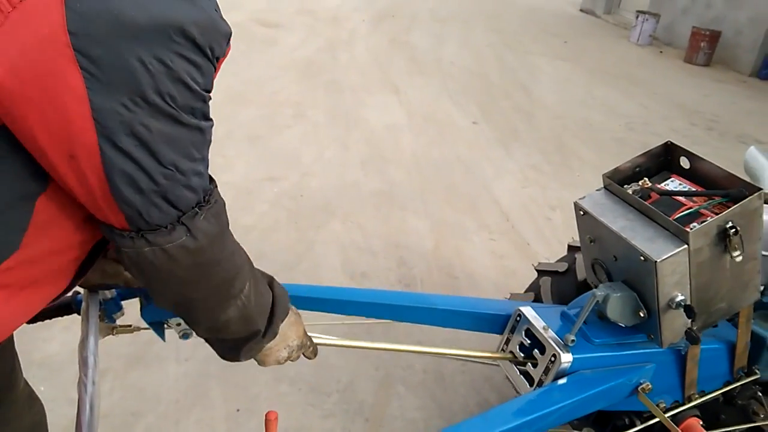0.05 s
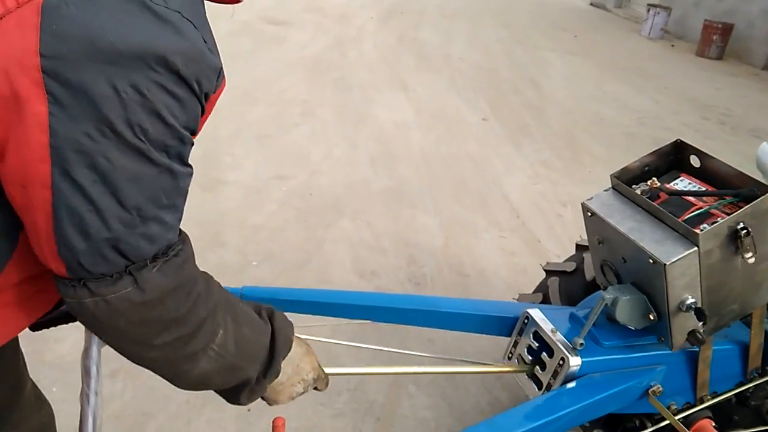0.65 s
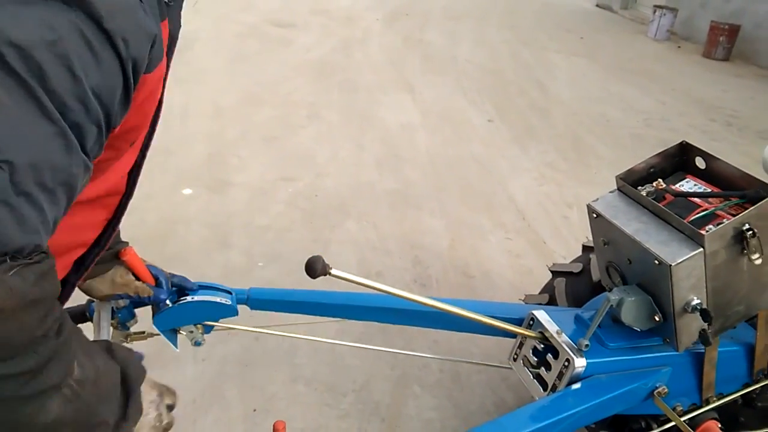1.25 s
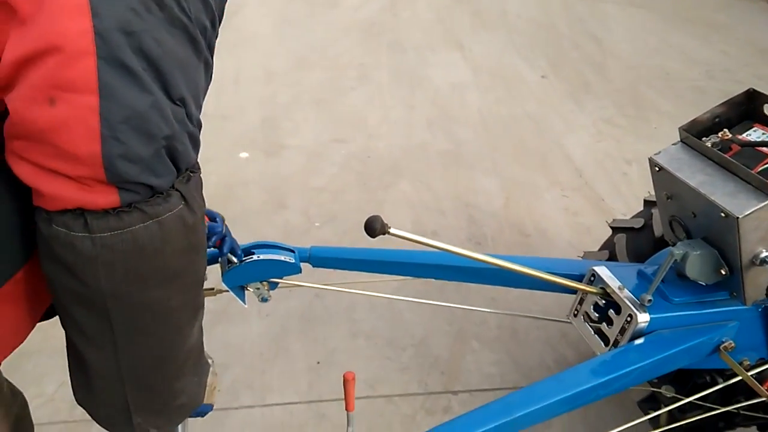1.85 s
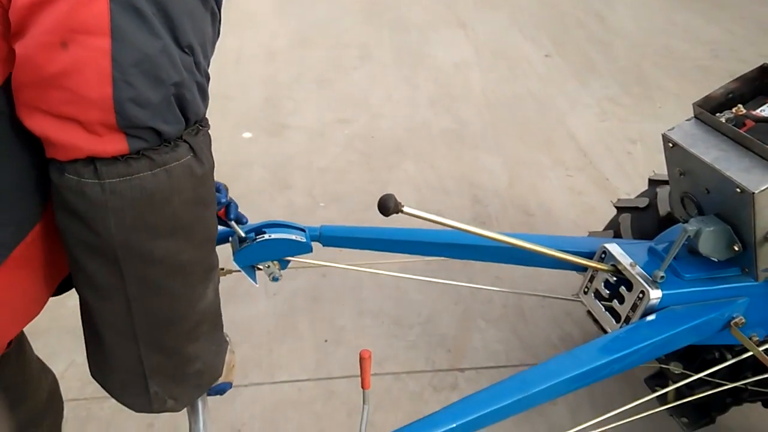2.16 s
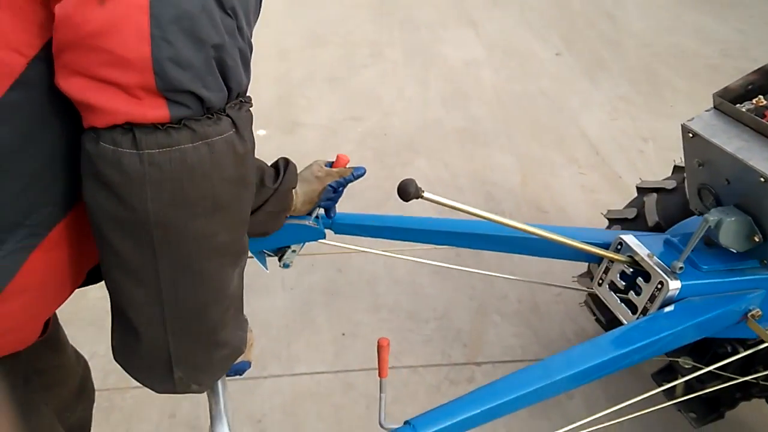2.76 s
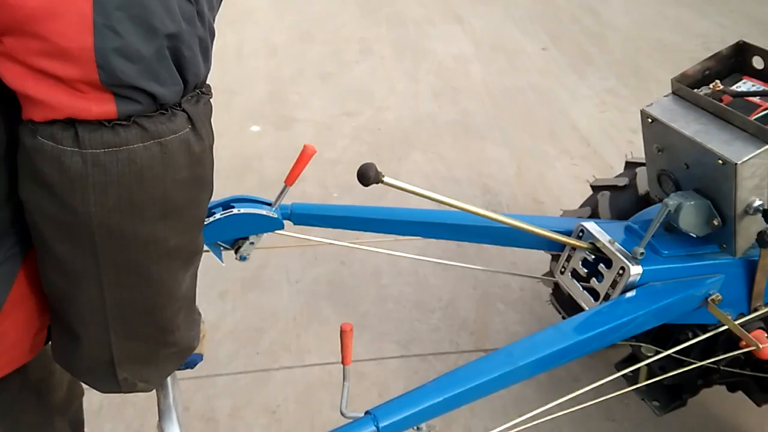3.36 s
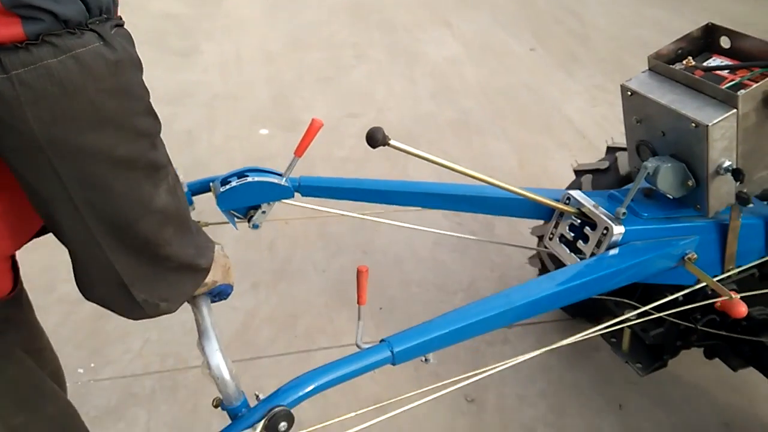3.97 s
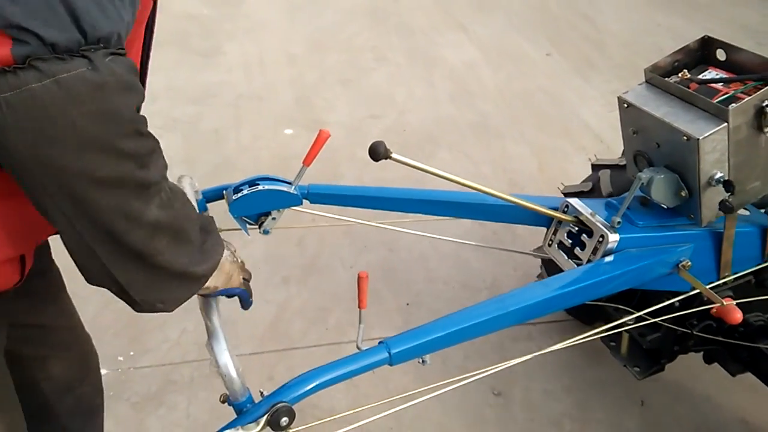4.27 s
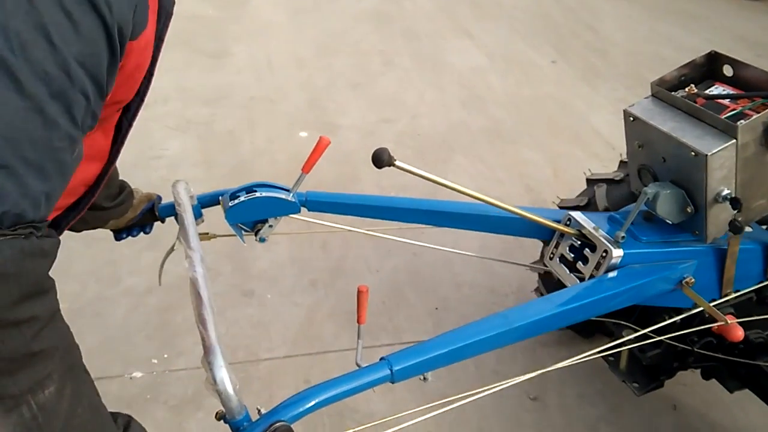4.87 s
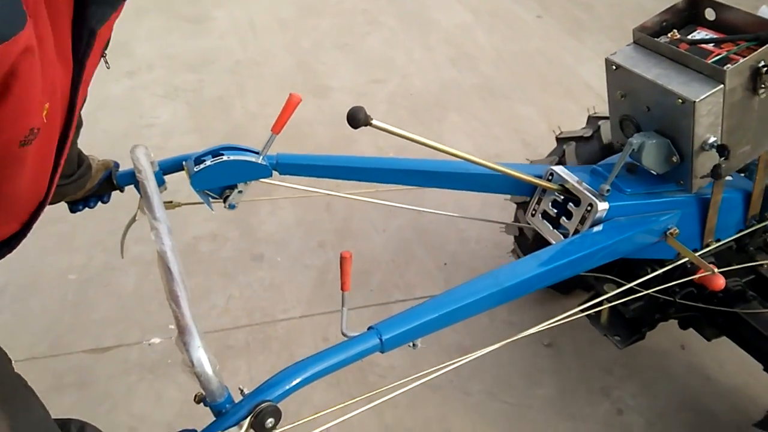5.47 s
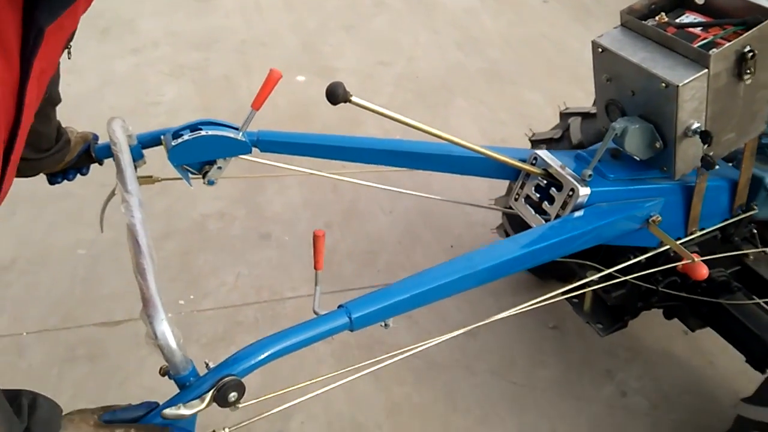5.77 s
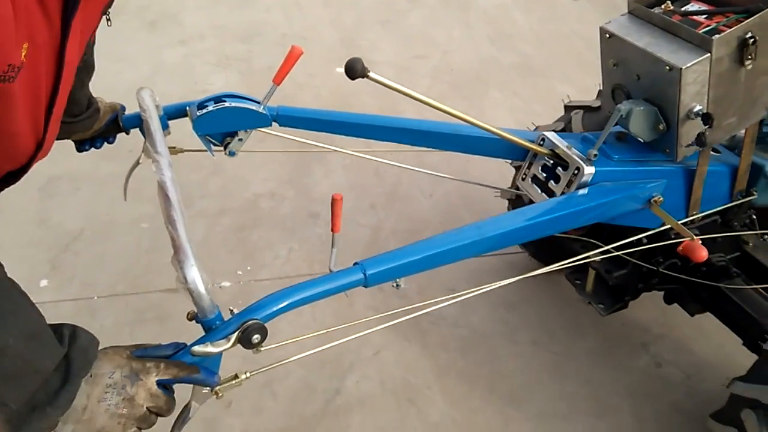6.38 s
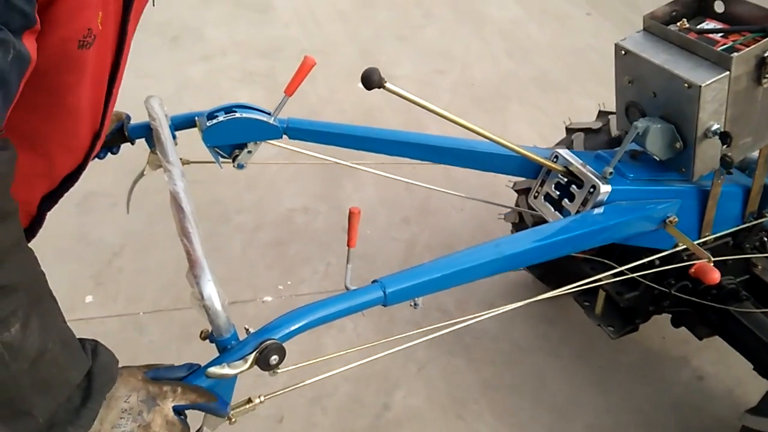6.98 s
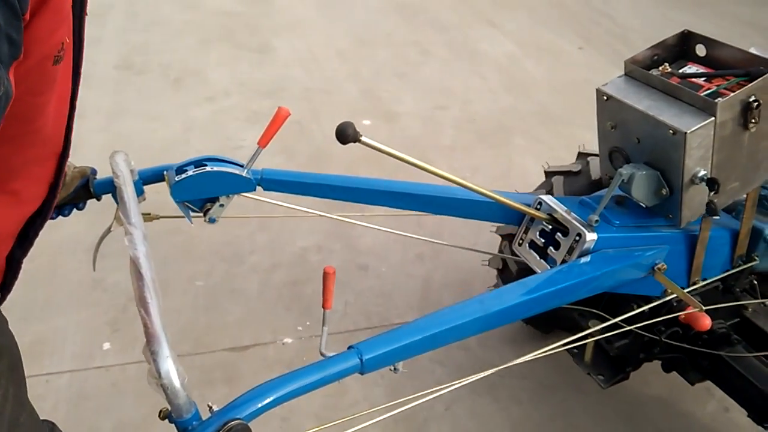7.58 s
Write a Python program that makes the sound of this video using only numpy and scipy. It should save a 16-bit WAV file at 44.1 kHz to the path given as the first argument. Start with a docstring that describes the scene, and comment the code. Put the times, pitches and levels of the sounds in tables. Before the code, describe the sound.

Heard from the handlebars, a small tractor's one-cylinder diesel engine chugs at a fast, even idle, knocking and thudding while its casing and thin steel covers clatter. Two sharp gear lever clacks come in the first second or so, followed by brief metallic jingles and clinks. Later a hand bumps and taps dully on the handlebar. The engine never stops, with a low wash coming back from the concrete yard.

```python
"""A single-cylinder diesel idles in a walking tractor in a concrete yard, heard from the handlebars.
Every second turn it fires: the block knocks, exhaust and intake thud, the piston and valve gear set
the casing clattering, and loose sheet metal rattles with the jolts. The driver clacks the gear lever
home and shifts his grip. The yard throws back a low wash; the microphone overloads on the loudest beats."""
import sys
import numpy as np
from scipy import signal
from scipy.fft import rfft, irfft
from scipy.io import wavfile

SR = 44100
rng = np.random.default_rng(int(sys.argv[2]) if len(sys.argv) > 2 else 0)


def to_wav(sig):
    """Store sig (one row per channel, or 1-D mono) as 16-bit WAV at the path in sys.argv[1].

    Samples outside -1..1 are clipped; the rate is SR.
    """
    pcm = np.clip(np.atleast_2d(sig), -1, 1) * 32767
    pcm = np.round(pcm).astype(np.int16)
    wavfile.write(sys.argv[1], SR, pcm.T)  # frames by channels


N = 336483
TIME = np.arange(N) / SR

# The bright tone of thin sheet metal. Each row: frequency in Hz, relative level in dB.
SHEET_TONE = [(1000, -2), (3000, -17.5), (4000, -9), (5300, -11.5), (6300, 0), (7400, 1), (8500, 0),
              (10000, -6), (12000, -10.5), (14000, -12.5)]


def firing_times(first_firing_s=0.0835):
    """The beat, in seconds: a four-stroke fires once in two turns. One extra cycle pads either end."""
    # The crank, held near idle by the governor. Each row: time in seconds, revolutions a minute.
    crank_speed = [(0.0, 1067.0), (0.6, 1054.6), (1.4, 1023.9), (1.85, 1059.1), (2.8, 1056.9),
                   (3.2, 1069.4), (4.85, 1069.5), (5.0, 1061.1), (5.65, 1083.1), (6.55, 1071.3),
                   (7.2, 1056.5), (7.6, 1062.1)]
    cycles = np.cumsum(np.interp(TIME, *np.transpose(crank_speed))) / (2 * 60 * SR)
    cycles -= np.interp(first_firing_s, TIME, cycles)
    fired = np.interp(np.arange(int(cycles[-1]) + 1), cycles, TIME)
    return np.r_[2 * fired[0] - fired[1], fired, 2 * fired[-1] - fired[-2]]


def combustion():
    """The punch of each firing in dB: a slow course, chance, and a few hard hits."""
    # The force sags as the gear goes in, then the governor answers. Each row: time in seconds, level in dB.
    force = [(0, -2.5), (.85, -2.5), (1.2, -5), (1.5, -2.5), (2.0, .5), (2.3, -5.5), (2.5, -0.5),
             (3.15, -1.5), (3.45, 0), (5.4, -0.1), (5.8, 0), (7.6, -1)]
    # Firings that hit harder than their neighbours. Each row: time in seconds, boost in dB.
    hard_firings = [(1.459, 6), (1.690, 3.5), (2.938, 1), (3.612, 0.5), (5.409, 2), (5.520, 2)]
    force_db = per_cycle(force) + scatter(spread_db=1)
    for time, boost_db in hard_firings:
        force_db[np.argmin(abs(firing_times() - time))] += boost_db
    return force_db


def knock(force_db, degrees=10.49, detune=0.003):
    """The pressure jump strikes the block, never twice alike; close modes beat, so the tail flutters."""
    # The block's modes. Each row: pitch in Hz, level in dB, t60 in seconds, left over right in dB.
    block_modes = [(617, -29.5, 0.32, 19.5), (778.5, -11.5, 0.13, -8), (843, -14, 0.12, 5.5),
                   (794, -24, 0.028, 15), (935.6, -11, 0.23, -5), (875, -27, 0.055, 12),
                   (1048, -33, 0.14, -23.5), (1345, -22.5, 0.074, 4), (1150, -43, 0.08, 2),
                   (1460, -30, 0.13, 7), (2120, -17, 0.024, -3)]
    age = TIME[:SR // 5]
    out = np.zeros((2, N + 2 * SR))  # a second of room at either end
    starts = np.round((at_crank(degrees) + 1) * SR).astype(int)
    for k, (hz, db, t60, pan_db) in enumerate(block_modes):
        polarity = (-1) ** (k + 1)
        strengths = polarity * from_db(force_db + db + scatter(spread_db=0.8))
        pitches = hz * (1 + detune * rng.standard_normal(len(starts)))
        panned_decay = from_db(-60 * age / t60) * from_db([[pan_db / 2], [-pan_db / 2]])
        for at, strength, pitch in zip(starts, strengths, pitches):
            out[:, at:at + len(age)] += strength * panned_decay * np.sin(2 * np.pi * pitch * age)
    left, right = out[:, SR:SR + N]
    return np.array([left, at_far_port(right)])


def gas_pulses(jitter_s=0.00028):
    """Puffs of gas thud into the silencer and air cleaner, which boom for a few periods."""
    # In crank order: combustion through the walls, exhaust opening, intake opening, intake shutting.
    # Each row: degrees after firing, pitch in Hz, level in dB, t60 in seconds, dB gained per dB of swell.
    puffs = [(5, 127, -27, 0.084, 0.5), (54.7, 338, -21.5, 0.097, 1), (84, 330, -27.5, 0.098, 1.85),
             (172, 240, -21.5, 0.026, 1), (207.2, 72.4, -6.5, 0.069, 0), (364.5, 107, -14.5, 0.1, -0.5),
             (383.1, 294.5, -9, 0.065, 0.15), (569, 68, -16, 0.054, 0.94), (586.1, 198.5, -10.5, 0.13, 0),
             (586.9, 246, -13.5, 0.026, 0)]
    # The swell of the exhaust boom. Each row: time in seconds, level in dB.
    boom_swell = [(0, -2.5), (1.35, 5), (1.5, 7.5), (2.2, 7.5), (3.0, 8), (4.0, -3), (5.0, -2), (6.0, -2.5),
                  (6.7, -2), (7.6, 0)]
    swell_db = per_cycle(boom_swell)
    thuds = np.zeros(N)
    for degrees, hz, db, t60, share in puffs:
        times = at_crank(degrees) + jitter_s * rng.standard_normal(len(swell_db))
        strengths = from_db(db + share * swell_db + scatter(spread_db=0.87))
        thuds += ring(clicks(times, strengths), hz, t60)
    return np.array([thuds, at_far_port(thuds)])


def piston_slap(clatter_db, degrees=20, level_db=-29, rise=0.00096, t60=0.12):
    """The piston hits the same spot every cycle, so the casing answers with the same dense ring."""
    # The tone of that answer. Each row: frequency in Hz, relative level in dB.
    slap_tone = [(300, -30.5), (600, 10.5), (1000, 7), (1500, 11), (2300, -0.5), (3100, -13), (4500, -23),
                 (14000, -12)]
    age = TIME[:SR // 4]
    answer = rng.standard_normal((2, len(age))) * swell_and_decay(age, rise, t60)
    hits = clicks(at_crank(degrees), from_db(clatter_db))
    slaps = signal.oaconvolve(hits[None], answer, axes=-1)[:, :N]
    return from_db(level_db) * rms_one(colour(slaps, slap_tone))


def casing(clatter_db, gears_db=-28):
    """Piston and valve gear clatter in the casing over the steady churn of the gears."""
    # Blows on the casing. Each row: degrees after firing, level in dB, rise and t60 in seconds.
    blows = [(20, -9.5, 0.0045, 0.091), (141, -24.5, 0.0051, 0.1), (403, -15.5, 0.0026, 0.069)]
    # The casing's hard midrange. Each row: frequency in Hz, relative level in dB.
    casing_tone = [(150, -6.5), (470, -12.5), (620, 3), (1000, -0.5), (1200, -3), (1600, -3.5), (2000, 0.5),
                   (2450, -4), (3100, -21), (4000, -13.5), (5500, -21), (14000, -43)]
    power = from_db(gears_db) ** 2
    for k, (degrees, db, rise, t60) in enumerate(blows):
        piston_db = clatter_db * (k == 0)  # the valve springs always hit equally hard
        power = power + bursts(at_crank(degrees), db + piston_db, rise, t60)
    return gritty_noise(power, casing_tone, grain_db=1.5, grain_rate=700)


def sheet_metal(force_db, level_db=-4, steady_db=-26, tinkle_db=-4.5):
    """Each jolt showers covers, cables and rods with tiny contacts: a fine sizzle and a coarser tinkle."""
    # The engine's jolts. Each row: degrees after firing, relative level in dB, rise and t60 in seconds,
    # dB gained per dB of looseness.
    jolts = [(-10.5, -4, 0.0034, 0.064, 0.53), (141, -12.5, 0.0026, 0.29, 0.93),
             (375, -4, 0.0059, 0.084, -0.6), (585, -12.5, 0.0019, 0.044, 1.3)]
    # How freely the metal rattles. Each row: time in seconds, looseness in dB.
    looseness = [(0, 1), (.6, 1), (1.8, 2), (2.25, 2.5), (2.6, 2), (3.15, 3), (4.3, -2), (4.8, 0),
                 (5.45, 1), (6.0, 1.5), (6.4, 0.8), (7.6, -0.5)]
    force_share, settling_db_per_s = 0.55, 1.03
    power = from_db(steady_db) ** 2
    for degrees, db, rise, t60, share in jolts:
        # jolts early in the cycle follow the combustion; from the intake stroke on they slowly settle
        stroke_db = force_share * force_db if degrees < 270 else -settling_db_per_s * firing_times()
        jolt_db = db + stroke_db + share * per_cycle(looseness) + scatter(spread_db=2)
        power = power + bursts(at_crank(degrees), jolt_db, rise, t60)
    sizzle = gritty_noise(power, SHEET_TONE, grain_db=1, grain_rate=900)
    return from_db(level_db) * (sizzle + from_db(tinkle_db) * tinkle(np.sqrt(power)))


def tinkle(envelope, parts=40, contacts_per_s=700, spread_db=2.5, t60=0.06):
    """Loose parts touch one another; each rings briefly at a pitch of its own."""
    # The range in which they ring. Each row: frequency in Hz, relative level in dB.
    parts_tone = [(1700, -0.5), (2400, -6), (3100, -2), (4200, -1.5), (4900, -3.5), (5500, -7), (6500, 4),
                  (7500, 3)]
    at = rng.integers(0, N, int(contacts_per_s * N / SR))
    accents_db = spread_db * np.minimum(rng.exponential(1, len(at)), 3)
    strengths = envelope[at] * from_db(accents_db) * rng.choice([-1, 1], len(at))
    struck_part = rng.integers(0, parts, len(at))
    pitches = np.geomspace(2000, 7500, parts) * rng.uniform(0.99, 1.01, parts)
    out = np.zeros((2, N))
    for k, hz in enumerate(pitches):
        hits = clicks(at[struck_part == k] / SR, strengths[struck_part == k] * np.sqrt(hz))
        out += ring(hits, hz, t60) * np.array([[1], [rng.choice([-1, 1])]])  # in or out of step
    return rms_one(colour(out, parts_tone)) * np.sqrt(np.mean(envelope ** 2))


def covers(clatter):
    """Thin steel covers and rods pick up the clatter and ring on at their own pitches."""
    # Their narrow resonances. Each row: pitch in Hz, width in Hz, gain of the added ring in dB.
    resonances = [(894, 95, -2), (1463, 17, 0), (2778, 29, 5), (4237, 20, 4.5), (4873, 23, -2),
                  (7310, 71, -2)]
    out = clatter
    for hz, width_hz, db in resonances:
        out = out + from_db(db) * signal.lfilter(*signal.iirpeak(hz, hz / width_hz, fs=SR), clatter)
    return out


def lever_chatter(degrees=150, rise=0.003, t60=0.31):
    """For a few cycles at a time, each exhaust jolt jingles a loose lever on its quadrant."""
    # Spells of chatter. Each row: start and end in seconds, level in dB.
    spells = [(1.45, 1.80, -27), (2.46, 2.78, -17.5), (2.92, 3.22, -18.5), (5.40, 5.58, -25)]
    # The quadrant's thin jingle. Each row: frequency in Hz, relative level in dB.
    quadrant_tone = [(1000, -23), (3100, -13), (3600, -14), (4250, -6), (4600, -9), (4950, 5), (5400, -18),
                     (6200, -11), (9500, -1), (14000, -16)]
    jolts = at_crank(degrees)
    power = np.zeros(N)
    for start, end, db in spells:
        hits = jolts[(start < jolts) & (jolts < end)]
        power += bursts(hits, np.full(len(hits), db), rise, t60)
    return gritty_noise(power, quadrant_tone, grain_db=2, grain_rate=300)


def gear_lever():
    """The driver clacks the gear lever home through its gate."""
    # The clacks. Each row: start in seconds, level in dB, rise and t60 in seconds.
    clacks = [(.482, -1.5, 0.015, 0.23), (.597, -13, .001, 0.05), (1.030, -3.5, 0.01, 0.16)]
    # The gate's sharp bite. Each row: frequency in Hz, relative level in dB.
    gate_tone = [(500, -7), (1400, -5), (2150, 6), (3000, -7), (4500, -5), (7500, 3), (10000, -12.5),
                 (14000, -14)]
    return gritty_noise(contact_power(clacks), gate_tone, grain_db=3, grain_rate=500)


def cable_clinks():
    """Cables and levers give a few short, bright clinks."""
    # The clinks. Each row: start in seconds, level in dB, rise and t60 in seconds.
    clinks = [(.022, -4.5, .003, 0.034), (2.011, -8, 0.0022, 0.057), (2.936, -8, .002, 0.055)]
    return gritty_noise(contact_power(clinks), SHEET_TONE, grain_db=3, grain_rate=900)


def sleeve_bumps():
    """Sleeve and glove bump on the handlebar as the driver shifts his grip."""
    # The bumps. Each row: start in seconds, level in dB, rise and t60 in seconds.
    bumps = [(5.22, -24, 0.0087, .2), (6.23, -9, 0.011, 0.21), (7.0, -8, 0.18, 0.99),
             (7.34, -4.5, 0.022, 0.64), (7.52, -8, 0.014, 0.24)]
    # The muffled tone of cloth. Each row: frequency in Hz, relative level in dB.
    cloth_tone = [(25, -60), (70, -3), (120, 5.5), (200, -6), (400, -10.5), (600, -12), (1200, -27),
                  (4000, -50)]
    return gritty_noise(contact_power(bumps), cloth_tone, grain_db=2, grain_rate=80)


def knuckle_taps():
    """A knuckle knocks on the hollow handlebar, which rings dully."""
    # The taps. Each row: start in seconds, pitch in Hz, level in dB, t60 in seconds.
    taps = [(5.233, 521, -13.5, 0.19), (7.373, 98, -12, 0.14), (7.384, 447, -11, 0.057)]
    return sum(ring(clicks(np.array([start]), from_db([db])), hz, t60) for start, hz, db, t60 in taps)


def yard(level_db=-26.2):
    """A steady bed of noise stands for the wash that the concrete yard throws back."""
    # Its low rumble. Each row: frequency in Hz, relative level in dB.
    rumble_tone = [(20, -30), (50, 12), (90, -22), (200, -0.5), (330, -0.5), (480, -14.5), (900, -13),
                   (2000, -25), (3200, -23.5), (7500, -33.5), (14000, -50)]
    return shaped_noise(from_db(level_db), rumble_tone)


def at_crank(degrees):
    """The moment in each cycle when the crank has turned this far past firing."""
    fired = firing_times()
    return fired + np.gradient(fired) * degrees / 720


def per_cycle(curve):
    """The value of a slow curve at each firing."""
    return np.interp(firing_times(), *np.transpose(curve))


def scatter(spread_db):
    """A random offset in dB for each cycle: no two are equally strong."""
    return spread_db * rng.standard_normal(len(firing_times()))


def clicks(times, gains):
    """One click of the given height at each time."""
    out = np.zeros(N)
    at = np.round(times * SR).astype(int)
    inside = (at >= 0) & (at < N)
    out[at[inside]] = gains[inside]
    return out


def ring(hits, hz, t60):
    """A resonator: a unit click starts a sine of height 1 that falls 60 dB in t60 seconds."""
    decay, step = from_db(-60 / (t60 * SR)), 2 * np.pi * hz / SR
    return signal.lfilter([0, decay * np.sin(step)], [1, -2 * decay * np.cos(step), decay ** 2], hits + 1e-18)


def swell_and_decay(age, rise, t60):
    """The envelope of one blow."""
    return (1 - np.exp(-age / rise)) * from_db(-60 * age / t60)


def bursts(times, levels_db, rise, t60):
    """The power envelope of a run of blows of one shape."""
    shape = swell_and_decay(TIME[:SR], rise, t60)
    power = np.zeros(N + 2 * SR)  # a second of room at either end
    for start, db in zip(times, levels_db):
        at = int((start + 1) * SR)
        room = len(power[at:at + SR])
        power[at:at + room] += (from_db(db) * shape[:room]) ** 2
    return power[SR:SR + N]


def contact_power(contacts):
    """The power envelope of single contacts, each with a shape of its own."""
    return sum(bursts([start], [db], rise, t60) for start, db, rise, t60 in contacts)


def gritty_noise(power, tone, grain_db, grain_rate):
    """Rough contact: noise whose level flickers through grain_rate random values a second."""
    knots = rng.standard_normal(N // 8 + 2)
    flicker = np.interp(TIME * grain_rate, np.arange(len(knots)), knots)
    grains = rms_one(from_db(grain_db * flicker))
    return shaped_noise(np.sqrt(power) * grains, tone)


def shaped_noise(envelope, tone):
    """Noise driven by an envelope into a body; an envelope of 1 gives unit power."""
    noise = stereo_noise()
    return colour(noise * envelope, tone) / np.std(colour(noise, tone))


def stereo_noise():
    """White noise at the microphone's two ports: alike in the bass, unrelated in the high treble."""
    # The stereo image. Each row: frequency in Hz, left-right correlation from -1 to 1.
    likeness = [(50, 0.63), (350, 0.75), (600, 0.54), (900, 0.39), (1500, -0.52), (2500, 0.22),
                (14000, 0.027)]
    hz, alike = np.transpose(likeness)
    mid = colour(rng.standard_normal((1, N)), np.c_[hz, 10 * np.log10(1 + alike)])
    side = colour(rng.standard_normal((1, N)), np.c_[hz, 10 * np.log10(1 - alike)])
    return rms_one(mid + side * [[1], [-1]])


def at_far_port(x, lag_s=0.00025):
    """Sound reaches the far, right-hand port a moment late."""
    return np.interp(TIME - lag_s, TIME, x)


def colour(x, tone, size=4096):
    """A causal equaliser that follows a curve of (Hz, dB) points."""
    hz, db = np.transpose(tone)
    bins_hz = np.arange(size // 2 + 1) * SR / size + 1
    log_gain = np.log(from_db(np.interp(np.log(bins_hz), np.log(hz), db)))
    cepstrum = irfft(log_gain)[:size // 2]
    cepstrum[1:] *= 2  # minimum phase: nothing rings ahead of a hit
    response = irfft(np.exp(rfft(cepstrum, size)))[:size // 2]
    return signal.oaconvolve(x, response[None], axes=-1)[:, :N]


def from_db(db):
    """Decibels to gain."""
    return 10 ** (np.asarray(db) / 20)


def rms_one(x):
    """Scale to unit power."""
    return x / np.sqrt(np.mean(x ** 2) + 1e-20)


def scene():
    """Engine, gear lever and hands over the wash of the yard."""
    # How the casing's clatter rides against the knock. Each row: time in seconds, offset in dB.
    clatter_balance = [(0, 0.6), (2.4, 1.5), (3.1, 4.5), (3.65, 2.5), (4.1, 2), (5.8, 2), (6.5, -0.5),
                       (7.6, -5)]
    force_db = combustion()
    clatter_db = force_db + per_cycle(clatter_balance) + scatter(spread_db=1)
    engine_metal = piston_slap(clatter_db) + casing(clatter_db) + sheet_metal(force_db)
    controls = lever_chatter() + gear_lever() + cable_clinks()
    hands = sleeve_bumps() + knuckle_taps()
    return knock(force_db) + gas_pulses() + covers(engine_metal + controls) + hands + yard()


def record(dry, low_cut_hz=44.4, high_cut_hz=14300):
    """Each port adds its own colour; the deepest bass is cut, peaks overload and the top is cut."""
    # The left port resonates in the treble. Each row: frequency in Hz, gain in dB.
    left_port = [(60, -3), (220, -2), (330, -3), (500, -4.5), (800, 3.5), (1200, -0.5), (1800, 1),
                 (2700, 0.5), (4200, 4.5), (7000, -0.5), (8500, 11), (9600, 17), (11500, 11.5),
                 (14000, 4.5)]
    # The right port lifts the upper mids. Each row: frequency in Hz, gain in dB.
    right_port = [(60, -1.86), (500, -1.55), (1200, 2.5), (1800, 6), (4200, 1.9), (14000, 0.8)]
    heard = np.vstack([colour(dry[:1], left_port), colour(dry[1:], right_port)])
    heard = signal.sosfilt(signal.butter(5, low_cut_hz, "high", fs=SR, output="sos"), heard)
    clipped = np.clip(heard, -1, 1)
    return signal.sosfilt(signal.ellip(10, 0.2, 60, high_cut_hz, fs=SR, output="sos"), clipped)


dry = scene()
out = record(dry)
to_wav(out)
```